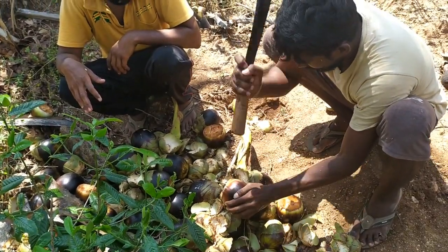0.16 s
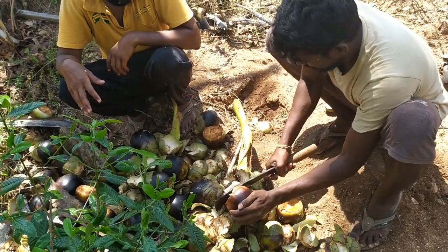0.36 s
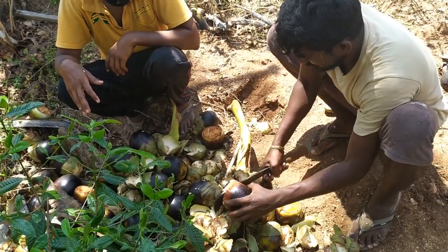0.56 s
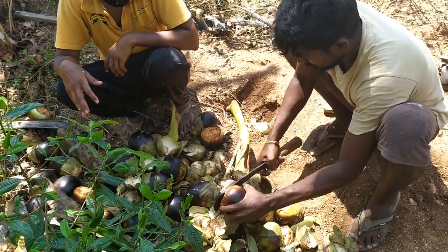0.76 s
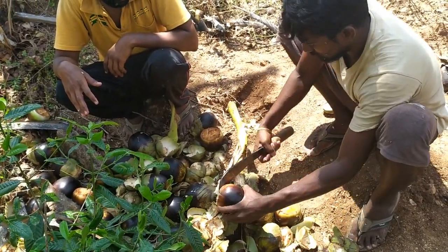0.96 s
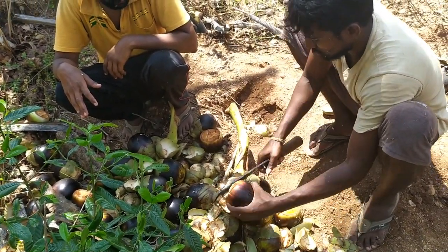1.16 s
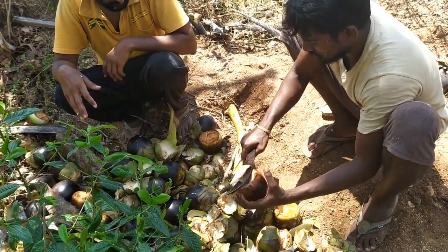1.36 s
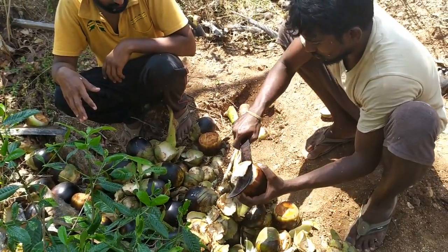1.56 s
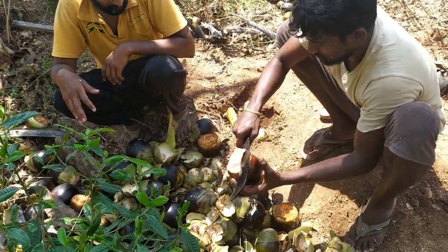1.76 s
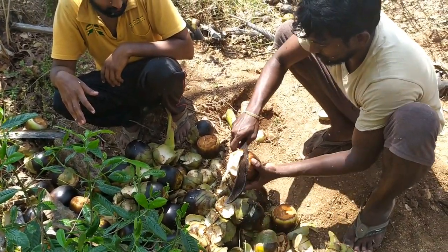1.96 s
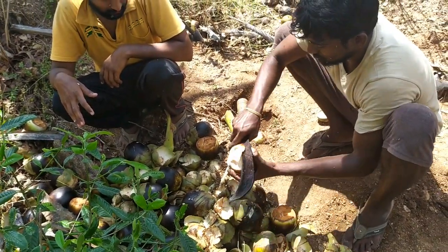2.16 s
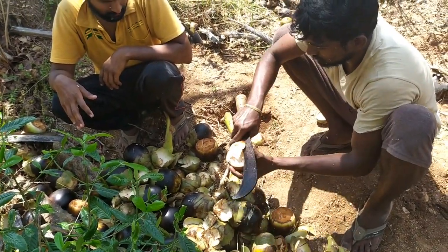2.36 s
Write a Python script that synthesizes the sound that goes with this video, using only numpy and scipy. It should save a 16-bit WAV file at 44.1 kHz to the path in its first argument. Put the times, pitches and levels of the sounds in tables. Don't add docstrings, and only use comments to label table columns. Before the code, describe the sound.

After a brief quiet shuffle, one loud, dry chop splits a fibrous fruit; crumbs scatter, then sparse clicks, dull knocks and husk crackle fade into near quiet. Open air, dry soil, close stereo microphone.

```python
import sys
import numpy as np
from scipy import signal
from scipy.io import wavfile
from scipy.ndimage import uniform_filter1d, map_coordinates

SR = 44100
rng = np.random.default_rng(int(sys.argv[2]) if len(sys.argv) > 2 else 0)


def master(y):
    cut = np.clip(np.atleast_2d(y).T, -1, 1)
    pcm = np.round(cut * 32767)
    wavfile.write(sys.argv[1], SR, pcm.astype(np.int16))


def invert_db(level):
    return 10 ** (np.asarray(level, dtype=float) / 20)


N = 105840

# f/Hz, level/dB per Hz
AIR_BASS = [(28, -37), (40, -9.5), (52, 1.5), (70, -5), (97, 2.5), (130, -12.5), (250, -17), (600, -22),
            (1500, -30.5)]
AIR_TREBLE = [(1500, -10.5), (2500, -4), (3700, -8), (5200, 0), (6800, -12.5), (10000, -13.5),
              (13500, -15.5), (15400, -21)]
# t/s, rise/s, hold/s, fall/s, level/dB
SHUFFLES = [
    (.0, 0.08, .07, 0.075, -75),
    (.3, 0.015, 0.045, 0.082, -72.5),
]
# t/s, level/dB, f/Hz, t60/s, woody body/dB
TICKS = [(0.0675, -57, 2700, .015, -30), (0.1498, -57, 3000, 0.025, -8),
         (0.2835, -50, 2500, 0.02, -12), (0.2868, -39, 3020, 0.017, -15),
         (0.3997, -59, 2870, 0.055, -25), (0.416, -42, 2500, 0.035, -10),
         (0.4325, -38, 2920, 0.019, -37), (0.4395, -53, 4500, 0.012, -37),
         (0.4739, -50, 3300, 0.018, -25), (0.4791, -43, 3030, 0.019, -12.5),
         (0.5028, -57, 4800, 0.013, -37), (0.5392, -47.5, 2800, 0.019, -16),
         (0.579, -56, 2700, 0.015, -28), (0.589, -52, 3050, 0.021, -16),
         (0.5935, -51.5, 3240, 0.028, -12), (0.6915, -49, 2700, 0.023, -20),
         (0.7228, -48.5, 2670, 0.022, -27), (0.751, -42, 2850, 0.015, -33),
         (0.7592, -42, 2730, 0.015, -36), (0.762, -41.5, 3320, 0.02, -23),
         (0.7982, -41, 2720, 0.022, -17), (0.8203, -45, 2970, 0.046, -26),
         (0.8496, -44, 2700, 0.037, -13), (0.8539, -37.5, 3520, 0.016, -13),
         (0.876, -39.5, 2200, 0.04, -19), (1.022, -52.5, 2700, 0.03, -20),
         (1.0375, -52, 3000, 0.02, -30), (1.0605, -49.5, 2700, 0.03, -20),
         (1.0635, -49, 2540, 0.033, -16), (1.1143, -51, 2820, 0.02, -14),
         (1.1178, -48, 4230, 0.02, -30),
         (1.2885, -51, 2300, 0.015, -15), (1.3216, -58, 2600, 0.015, -20),
              (1.3708, -43, 2700, 0.012, -30), (1.6085, -53, 2900, 0.03, -33),
              (1.7475, -55, 3600, 0.015, -35), (1.7805, -57, 3300, 0.015, -35),
              (1.9922, -36, 2300, 0.01, -22), (1.9925, -41, 3200, 0.008, -30),
              (2.0422, -53, 2640, 0.018, -20), (2.0776, -49, 2770, 0.012, -34),
              (2.0915, -52, 2280, 0.03, -29), (2.137, -55, 2790, 0.02, -23),
              (2.1495, -54, 3200, 0.012, -35), (2.153, -51, 2800, 0.03, -35),
              (2.1843, -49, 2660, 0.024, -18), (2.2738, -45, 2770, 0.015, -30),
              (2.3174, -52, 3300, 0.012, -25.5)]
THIN_TICKS = [(0.3544, -49, 4700, 0.016, -40), (0.4742, -57, 5800, 0.008, -40),
              (0.7505, -43, 7500, 0.008, -40), (0.7512, -48, 10500, 0.008, -40),
              (0.7592, -43, 9000, 0.03, -40), (1.8881, -51.5, 7600, 0.011, -40),
              (1.9922, -48, 5200, 0.008, -45), (1.9922, -38, 11600, 0.01, -45),
              (2.0124, -55, 4670, 0.014, -40), (2.0128, -57, 7500, 0.008, -40),
              (2.0595, -57, 11000, 0.006, -40), (2.2737, -57, 5500, 0.008, -40),
              (2.2737, -55, 12000, 0.008, -40)]
# t/s, level/dB, f/Hz, t60/s
CRACKS = [(.2268, -3.5, 2780, 0.011), (.2268, -20, 8000, 0.006), (.2268, -24, 13500, 0.006),
          (.2345, -24, 13900, 0.015), (.2269, -6.5, 3960, 0.022), (.2270, -13, 5555, 0.025),
          (.2310, -12, 5250, 0.02), (.2337, -6, 3656, .012), (.2357, -7, 4300, 0.011),
          (.2371, -2.5, 2600, 0.013), (.2371, -14, 2150, 0.014), (0.2369, -10.5, 1750, .016)]
# t/s, level/dB, crest delay/s, turns per e-fold of time,
# spread/e-folds
THUMPS = [
    (.236, -27, .0155, 1.44, .42),
          (0.64, -40.5, 0.0046, 0.92, 1.08),
    (.742, -45.5, 0.0416, 3.4, 0.19),
    (1.989, -58, 0.01, 1.54, 0.86),
]
# f/Hz, level/dB, t60/s
SHELL_MODES = [(235, -33, 0.032), (413, -24, .045)]
HUSK_MODES = [(620, -31, 0.034), (844, -24.5, .04), (1400, -24, .02), (1750, -24, .02)]
# f/Hz, level/dB
FIBRE_RINGS = [(950, -12), (1500, -6), (2200, -4), (2750, 1), (3400, -1), (4300, -4), (5400, -7),
               (6800, -11), (9500, -8)]
# t/s, rise/s, hold/s, fall/s, level/dB
RUBS = [(.70, 0.05, 0.04, 0.043, -55.5), (.79, 0.027, 0.035, 0.07, -55), (.87, 0.014, 0.073, 0.072, -65.5),
        (.98, 0.038, 0.051, 0.047, -59.5), (1.07, 0.029, 0.039, 0.091, -65.5),
        (1.52, 0.05, 0.027, 0.026, -68.5), (1.592, 0.015, 0.023, 0.055, -62),
        (1.722, 0.022, 0.03, 0.07, -64), (2.0, 0.02, 0.11, 0.059, -71), (2.12, 0.027, 0.04, 0.3, -66),
        (.3, .02, .1, .25, -68)]
# t/s, rise/s, hold/s, fall/s; then their level/dB
SLIPS = [
    (.745, .006, .015, .03),
    (1.585, .025, .045, .02),
    (1.728, .015, .02, .06),
    (2.03, .03, .1, .08),
    (1.02, .03, .07, .04),
]
SLIP_LEVELS_DB = [-57.5, -66, -66, -74, -67.5]
# t/s, level/dB, f/Hz, t60/s
KNOCKS = [
    (.325, -50, 450, 0.054),
    (.365, -59.5, 474, 0.04),
    (0.434, -54.5, 420, 0.033),
    (.597, -54.5, 874, 0.032),
    (0.615, -56.5, 490, 0.034),
    (.852, -55.5, 450, 0.032),
    (.903, -50.5, 1000, 0.027),
    (0.904, -55.5, 567, 0.014),
]
# f/Hz, width/Hz, level/dB
LEFT_PORT = [(2500, 1000, -16), (4000, 1000, -8), (5600, 1500, -15), (8500, 3000, -22), (12500, 3500, -27),
             (15000, 2500, -26)]
RIGHT_PORT = [(2700, 800, 2), (3800, 900, -1), (5200, 1300, -1), (7800, 2500, -4), (11300, 3000, -10),
              (14500, 2500, -10)]

AIR_BASS_DB, AIR_TREBLE_DB, AIR_PAN_DB, ALIKE_HZ = -67, -71.5, -3, 300
AIR_PORT_HZ, AIR_PORT_DB, AIR_PORT_SPREAD = 2700, -11, .15
SHUFFLE_HZ, SHUFFLE_WIDTH_HZ = 450, 350
TICK_DB, TICK_SNAP_DB, TICK_CLICK_DB = -4, -20, 21
TICK_BODY_HZ, TICK_BODY_DB = 1450, 12
CRACK_S, FRUIT_STRUCK_S = .2268, .2365
TEAR_S, TEAR_LENGTH_S, TEAR_DB, TEAR_T60_S = .2269, .0115, -13.5, .02
DEBRIS_DB, DEBRIS_T60_S, SETTLE_DB, SETTLE_T60_S = -28.5, .069, -41.5, .34
DUST_DB, DUST_T60_S, DUST_TOP_HZ = -38, .4, 13000
FIBRE_GRAINS_PER_S, FIBRE_SCATTER_DB, FIBRE_HISS_DB = 1200, 3.5, -3.5
SLIP_HZ, SLIP_TOP_HZ = 4300, 8600
SCATTER_DB, SCATTER_HZ, SCATTER_T60_S = -3, 2500, .012
ECHO_DB, ECHO_T60_S = -34, .1
LEFT_LOW_DB, RIGHT_LOW_DB, PORT_LOW_HZ, PORT_TOP_HZ = -14.5, -10, 1500, 18000
LEFT_LAG_S, BASS_LAG_RAD, RUMBLE_CUT_HZ = .00004, .5, 40
THUMP_PAN_DB, SOFT_PAN_DB = -.6, -4.5


def level(x, db):
    return x * invert_db(db) / np.sqrt(np.mean(x ** 2))


def band(x, hz, width_hz):
    return signal.lfilter(*signal.iirpeak(hz, hz / width_hz, SR), x)


def edge(x, hz, kind):
    return signal.lfilter(*signal.butter(2, hz, kind, fs=SR), x)


def since(s):
    return np.maximum(np.arange(N) / SR - s, 0)


def fade(s, t60_s):
    return (since(s) > 0) * invert_db(-60 * since(s) / t60_s)


def tone(s, hz):
    return np.sin(2 * np.pi * hz * since(s))


def swells(rows):
    t = np.arange(N) / SR
    x = 0
    for s, rise, hold, fall, db in rows:
        x = x + invert_db(db) * np.interp(t, np.cumsum([s, rise, hold, fall]), [0, 1, 1, 0]) ** 2
    return x


def walk(rate_hz):
    k = int(SR / rate_hz)
    held = np.repeat(rng.standard_normal(N // k + 1), k)
    return 1.3 * uniform_filter1d(uniform_filter1d(held, k), k)[:N]


def grains(per_s, scatter_db):
    hit = rng.random(N) < per_s / SR
    sign = np.sign(rng.standard_normal(N))
    size = np.minimum(rng.exponential(size=N), 3.5)
    return level(hit * sign * invert_db(scatter_db * size), 0)


def air(table, db):
    out, swell = 0, walk(.53)
    table_hz, table_db = np.array(table).T
    octaves = np.arange(.1, np.log2(table_hz[-1] / table_hz[0]), 1 / 5)
    for hz in table_hz[0] * 2 ** octaves:
        mid, side = (band(band(rng.standard_normal(N), hz, hz / 5), hz, hz / 5) for _ in range(2))
        here_db = np.interp(np.log(hz), np.log(table_hz), table_db) + .8 * swell + 1.2 * walk(13)
        bump = np.exp(-.5 * (np.log(hz / AIR_PORT_HZ) / AIR_PORT_SPREAD) ** 2)
        pan_db = AIR_PORT_DB * bump * np.array([[.5], [-.5]])
        width = np.sqrt(hz / (hz + ALIKE_HZ))
        out = out + invert_db(here_db + pan_db) * (mid + width * side * np.array([[1], [-1]]))
    return out * invert_db(db) / np.sqrt(np.mean(out.mean(axis=0) ** 2))


def shuffles():
    x = band(rng.standard_normal(N) * invert_db(2.5 * walk(40)), SHUFFLE_HZ, SHUFFLE_WIDTH_HZ)
    return swells(SHUFFLES) * level(edge(x, 850, "low"), 7.5)


def burst(hz, t60_s, noise, click_db=-40):
    def ring(x):
        return band(x, hz, .52 * hz)
    n = np.arange(len(noise))
    push = noise + invert_db(click_db) * (n == 1)
    decay = invert_db(-60 * n / SR / max(t60_s, .003))
    return ring(ring(push) * decay) / np.std(ring(ring(noise)))


def ticks():
    x = np.zeros(N)
    for s, db, hz, t60_s, body_db in TICKS + THIN_TICKS:
        noise = rng.standard_normal((3, 2000))
        ring = burst(hz, t60_s, noise[0], TICK_CLICK_DB)
        snap = invert_db(TICK_SNAP_DB) * burst(10000, .0017, noise[1])
        body = invert_db(body_db + TICK_BODY_DB) * burst(TICK_BODY_HZ, t60_s, noise[2], TICK_CLICK_DB)
        x[int(s * SR):][:2000] += invert_db(db + TICK_DB) * (ring + snap + body)
    return x


def fibres():
    x = 0
    for hz, db in FIBRE_RINGS:
        hiss = invert_db(FIBRE_HISS_DB) * rng.standard_normal(N)
        slips = grains(FIBRE_GRAINS_PER_S, FIBRE_SCATTER_DB) + hiss
        ring = band(band(slips, hz, .35 * hz), hz, .35 * hz)
        x = x + level(ring, db) * invert_db(2.0 * walk(40))
    return level(x, 0)


def chop():
    cracks = 0
    for s, db, hz, t60_s in CRACKS:
        start = max(s, CRACK_S)
        cracks = cracks + invert_db(db) * fade(start, t60_s) * tone(start, hz)
    end = TEAR_S + TEAR_LENGTH_S
    tear_shape = invert_db(TEAR_DB) * (since(TEAR_S) > 0) * invert_db(-60 * since(end) / TEAR_T60_S)
    tear = tear_shape * edge(grains(16000, 1.5), 13000, "low")
    crumb_shape = invert_db(DEBRIS_DB) * fade(end, DEBRIS_T60_S) + invert_db(SETTLE_DB) * fade(end, SETTLE_T60_S)
    specks = edge(edge(grains(5000, 2.5), 500, "high"), DUST_TOP_HZ, "low")
    dust = invert_db(DUST_DB) * fade(end, DUST_T60_S) * specks
    return cracks + tear + crumb_shape * fibres() + dust


def thumps():
    x = 0
    for s, db, crest_s, turns, spread in THUMPS:
        age = np.log((since(s) + 1e-6) / crest_s)
        x = x + invert_db(db) * np.exp(-.5 * (age / spread) ** 2) * np.cos(2 * np.pi * turns * age)
    return x


def fruit(modes):
    return sum(invert_db(db) * fade(FRUIT_STRUCK_S, t60_s) * tone(FRUIT_STRUCK_S, hz) for hz, db, t60_s in modes)


def rubs():
    crackle = fibres() * invert_db(1.3 * walk(90))
    hiss = edge(edge(grains(6000, 3.3), SLIP_HZ, "high"), SLIP_TOP_HZ, "low")
    slip_shape = swells([(*row, db) for row, db in zip(SLIPS, SLIP_LEVELS_DB)])
    return swells(RUBS) * crackle * invert_db(5.5) + slip_shape * level(hiss, 8.6)


def knocks():
    x = 0
    for s, db, hz, t60_s in KNOCKS:
        x = x + invert_db(db) * fade(s, t60_s) * (tone(s, hz) + .21 * tone(s, 1.26 * hz))
    return x


def scatter(x):
    noise = rng.standard_normal(1500) * invert_db(-60 * np.arange(1500) / SR / SCATTER_T60_S)
    path = edge(noise, SCATTER_HZ, "high")
    return x + invert_db(SCATTER_DB) * signal.fftconvolve(x, path / np.sqrt(np.sum(path ** 2)))[:N]


def port(x, peaks, low_db):
    rings = sum((-1) ** k * invert_db(db) * band(x, hz, width_hz) for k, (hz, width_hz, db) in enumerate(peaks))
    return edge(invert_db(low_db) * edge(x, PORT_LOW_HZ, "low") - rings, PORT_TOP_HZ, "low")


def pan(db):
    return invert_db(np.array([[db], [-db]]) / 2)


def scene():
    near = edge(chop() + fruit(HUSK_MODES) + ticks() + rubs(), 250, "high")
    late = map_coordinates(near, [np.arange(N) - LEFT_LAG_S * SR], mode="nearest")
    tail = rng.standard_normal((2, 8000)) * invert_db(ECHO_DB - 20 - 60 * np.arange(8000) / SR / ECHO_T60_S)
    echo = signal.fftconvolve(near[None], tail)[:, :N]
    left = port(scatter(late) + echo[0], LEFT_PORT, LEFT_LOW_DB)
    right = port(near + echo[1], RIGHT_PORT, RIGHT_LOW_DB)
    heard = np.array([left, right])
    low = signal.hilbert(edge(thumps() + fruit(SHELL_MODES), RUMBLE_CUT_HZ, "high"))
    turn = np.exp(.5j * BASS_LAG_RAD * np.array([[-1], [1]]))
    heard += pan(THUMP_PAN_DB) * np.real(low * turn)
    heard += pan(SOFT_PAN_DB) * (shuffles() + knocks())
    return heard + pan(AIR_PAN_DB) * (air(AIR_BASS, AIR_BASS_DB) + air(AIR_TREBLE, AIR_TREBLE_DB))


def low_pass(x):
    return signal.sosfilt(signal.butter(12, 16480, fs=SR, output="sos"), x)


def record(dry):
    steep = signal.ellip(8, .2, 60, 16100, fs=SR, output="sos")
    mix = signal.sosfilt(steep, dry)
    return low_pass(mix)


dry = scene()
out = record(dry)
master(out)
```